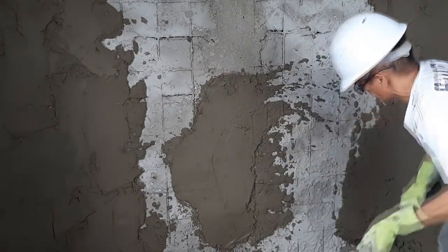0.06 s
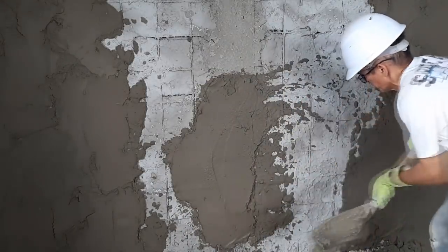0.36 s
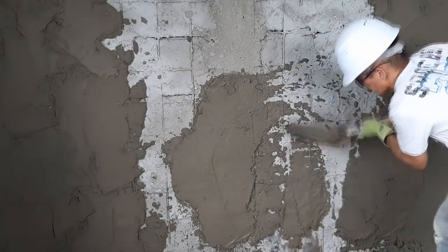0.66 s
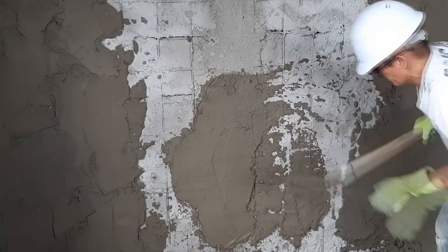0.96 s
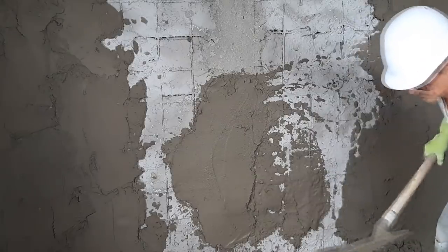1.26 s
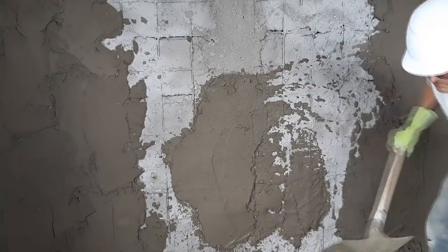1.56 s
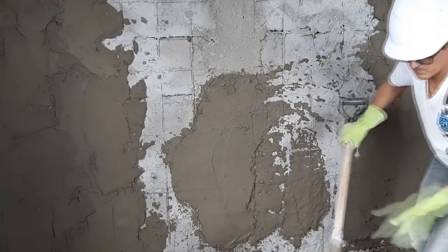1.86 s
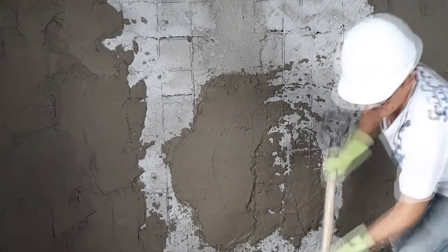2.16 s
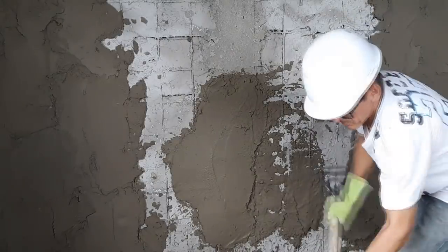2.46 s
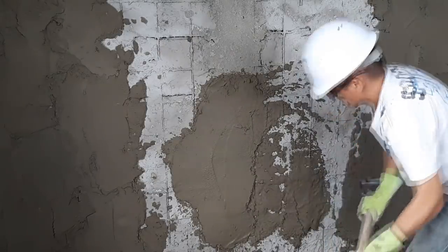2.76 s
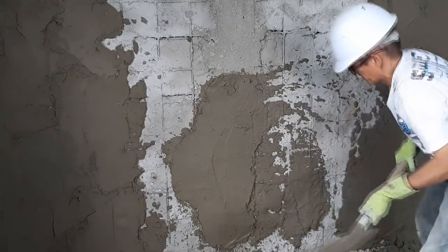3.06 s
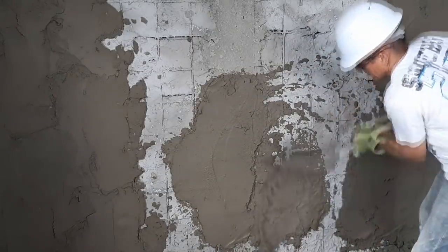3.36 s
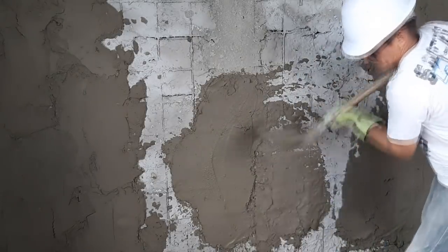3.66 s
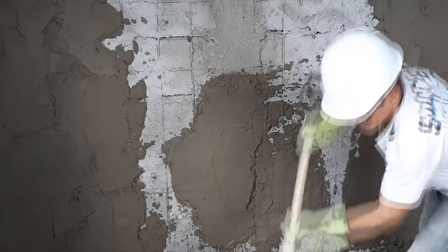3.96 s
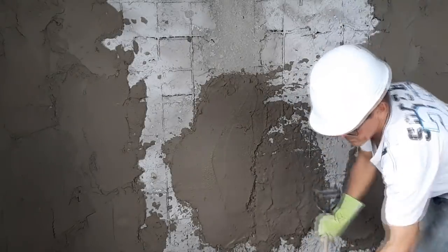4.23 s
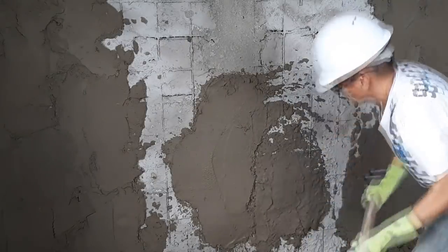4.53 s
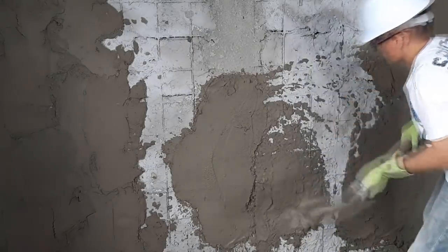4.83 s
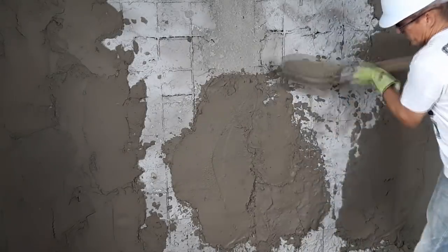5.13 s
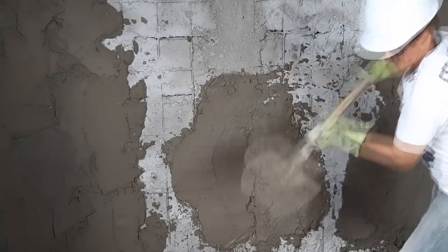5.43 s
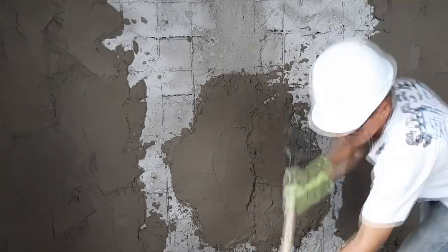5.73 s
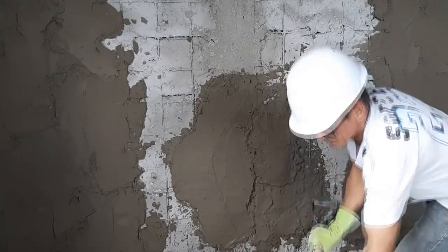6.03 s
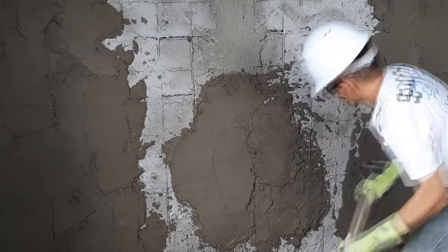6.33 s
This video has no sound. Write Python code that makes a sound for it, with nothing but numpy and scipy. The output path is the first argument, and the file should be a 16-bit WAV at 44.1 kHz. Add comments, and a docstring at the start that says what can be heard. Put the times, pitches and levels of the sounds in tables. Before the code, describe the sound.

A steel shovel scrapes up sandy mortar and throws it against a wall, landing in three wet, thudding splats with a short echo.

```python
"""Wet mortar slaps onto a block wall three times, shovelled off a concrete floor by a plasterer.
The steel blade grinds over sand; the load slides off it, lands as a burst of clods and spatters down.
The place is a bare room that rings briefly in the treble and booms in the bass, over a quiet site wash.
The stereo microphones stand far enough off to pick up more of the room than of the direct sound."""
import sys
import numpy as np
from scipy import signal
from scipy.fft import rfft, irfft
from scipy.io import wavfile
from scipy.ndimage import uniform_filter1d

SR = 44100
rng = np.random.default_rng(int(sys.argv[2]) if len(sys.argv) > 2 else 0)


def generate_wav(sig):
    """Save sig (samples, or channels by samples) to the path in sys.argv[1] as 16-bit PCM at SR."""
    pcm = np.round(np.clip(np.atleast_2d(sig).T, -1, 1) * 32767).astype(np.int16)
    wavfile.write(sys.argv[1], SR, pcm)


N = 281799
SPOTS = 3  # patches of the blade or load that sound at once
TAPS = 4096
HZ = np.fft.rfftfreq(TAPS, 1 / SR)
OCTAVES = np.log2(np.maximum(HZ, 400) / 3000)  # from 3 kHz; every tilt_db is in dB per octave

# the blade is driven into the heap: (time [s], length [s], level [dB], tilt [dB/octave],
# heap level [dB], blade note [Hz], note against heap [dB], judder level [dB])
HEAP_SCOOPS = [(2.289, .134, -15.5, 1.4, -27.5, 950, -8, -32.5),
               (4.121, 0.097, -14.5, 1.5, -18, 1142, -4.5, -42.5),
               (5.765, .125, -13, .95, -15.5, 1010, -12.5, -31.5)]
# the blade grazes the gritty floor: (time [s], length [s], level [dB], tilt [dB/octave])
FLOOR_GRAZES = [(0.21, 0.042, -40, -0.5), (0.25, 0.082, -30.5, 2), (0.294, 0.073, -28, 2.4),
                (1.467, 0.18, -39.5, 1), (1.593, 0.058, -39, 1), (1.736, 0.084, -40.5, 1),
                (1.799, 0.03, -32.5, -0.7), (2.078, 0.46, -35.5, -1), (2.181, .04, -22.5, -1.6),
                (2.522, 0.32, -46, 3.5), (3.69, 0.042, -46.5, -0.5), (4.075, 0.11, -25, -0.3),
                (4.304, 0.038, -35, 2.5), (5.427, 0.12, -41, 1), (5.558, 0.86, -50.5, 1),
                (6.045, 0.052, -35.5, -0.5)]
# wet mortar shifts on the blade: (time [s], length [s], level [dB], tilt [dB/octave])
MORTAR_SLIDES = [(0.105, 0.18, -48, 1), (0.402, 0.19, -24, 0.3), (0.949, 0.086, -32.5, .8),
                 (1.232, .15, -42, -1.5), (1.359, 0.15, -49.5, 2), (2.654, 0.044, -44, -1.5),
                 (2.845, 0.063, -47.5, 3.5), (3.014, 0.15, -47.5, 3.5), (3.085, .1, -29, -0.3),
                 (4.612, 0.081, -46, 2.5), (5.468, 0.099, -44, -7.5), (6.364, 0.038, -44.5, 0)]
# spectrum of crushed sand: (frequency [Hz], level [dB])
GRIT_SPECTRUM = [(35, -46), (60, -28.5), (153, -18.5), (189, -8.5), (308, -5), (458, -8), (579, -3),
                 (666, -3.5), (991, -2), (1950, -4.5), (2140, -3), (6140, -5.5), (7750, -12.5),
                 (13900, -10), (16000, -63)]
# likeness of the room sound at the two microphones: (frequency [Hz], coherence [0-1])
MIC_COHERENCE = [(100, 1), (290, 0.91), (640, 0.59), (1400, 0), (3000, 0)]


def amp(db):
    return 10 ** (np.asarray(db) / 20)


def unit_rms(x):
    return x / np.sqrt(np.mean(x ** 2) + 1e-20)


def curve(points, hz):
    """Points joined by straight lines on a log-frequency axis, flat above 14 kHz."""
    point_hz, value = np.transpose(points)
    return np.interp(np.log(np.minimum(hz, 14000) + 1), np.log(point_hz + 1), value)


def colour(spectrum, tilt_db):
    """Gain of a spectrum tilted brighter or duller."""
    return amp(curve(spectrum, HZ) + tilt_db * OCTAVES)


def add(mix, at_s, sound):
    part = mix[round(at_s * SR):][:len(sound)]
    part += sound[:len(part)]


def resonance(hz, width):
    """Gain of one resonance over frequency."""
    return 1 / np.sqrt(1 + ((HZ ** 2 - hz ** 2) / (width * HZ + 1e-9)) ** 2)


def ring(drive, envelope, gain, db):
    """An enveloped drive rings through a minimum-phase filter; db is the level at envelope 1."""
    cepstrum = irfft(np.log(np.maximum(gain / gain.max(), 1e-5)))
    cepstrum[1:TAPS // 2] *= 2
    cepstrum[TAPS // 2 + 1:] = 0
    response = irfft(np.exp(rfft(cepstrum)))
    sound = signal.fftconvolve(drive * envelope, response)
    return amp(db) * sound * np.linalg.norm(envelope) / (np.linalg.norm(sound) + 1e-12)


def grains(size, per_s, spread_db):
    """Clicks at random moments, most small and a few large; each spot gets its share of them."""
    strength = amp(spread_db * np.minimum(rng.exponential(1, size), 3.5))
    sign = rng.choice([-1, 1], size)
    hits = rng.random(size) < per_s / SPOTS / SR
    return strength * sign * (hits + 1e-3)


def clumps(size, per_s, depth_db):
    """Uneven pressure: a gain that wanders at random."""
    wander = np.interp(np.arange(size) / SR * per_s, np.arange(1000), rng.standard_normal(1000))
    return amp(depth_db * wander)


def stroke(swell_s, fade_s, bite):
    """Speed of a stroke: first contact (bite, 0-1), a push to the top, and slowing to rest."""
    t = np.arange(int((swell_s + fade_s) * SR)) / SR
    contact = np.minimum(t / (0.3 * swell_s), 1)
    push = bite + (1 - bite) * np.sin(np.pi / 2 * t / swell_s) ** 2
    slowing = np.cos(np.pi / 2 * (t - swell_s) / fade_s)
    return np.where(t < swell_s, push, slowing) * contact


def site_air():
    """The quiet wash of the site at both microphones, with a faint drone at 97 Hz."""
    # spectrum of the wash: (frequency [Hz], level [dB])
    wash_spectrum = [(15, -41.5), (25, -11), (170, 1.5), (714, -7), (1020, -11.5), (1160, -12.5),
                     (2160, -16), (2760, -17), (5570, -16.5), (6560, -14.5), (7710, -34), (13600, -24),
                     (16000, -55.5)]
    hz = np.fft.rfftfreq(N, 1 / SR)
    left, unrelated = rfft(rng.standard_normal((2, N)))
    coherence = curve(MIC_COHERENCE, hz)
    pair = np.array([left, coherence * left + np.sqrt(1 - coherence ** 2) * unrelated])
    wash = unit_rms(irfft(pair * amp(curve(wash_spectrum, hz)), N))
    drone = unit_rms(irfft(left / (1 + ((hz - 97) / 3) ** 2), N))
    return amp(-54) * wash + amp(-66.5) * drone


def reflections(t):
    """Dense echoes off bare walls, alike at both microphones in the bass, dying fastest in the treble."""
    # reverberation of the room: (frequency [Hz], T60 [s])
    decay_times = [(60, 1.43), (150, 0.36), (400, 0.81), (1000, 0.53), (3000, 0.44), (8000, 0.32),
                   (15000, 0.24)]
    echoes = rng.standard_normal((2, len(t))) * (t > 0.002) * (1 + 0.99 * np.exp(-t / 0.012))
    hz, frame_s, bands = signal.stft(echoes, SR, nperseg=512)
    coherence = curve(MIC_COHERENCE, hz)[:, None]
    bands[1] = coherence * bands[0] + np.sqrt(1 - coherence ** 2) * bands[1]
    bands *= 10 ** (-3 * frame_s / curve(decay_times, hz)[:, None])
    energy = (abs(bands) ** 2).sum(2, keepdims=True)
    bands /= np.sqrt(uniform_filter1d(energy, size=3, axis=1))
    tail = signal.istft(bands, SR, nperseg=512)[1][:, :len(t)]
    return tail / np.linalg.norm(tail, axis=1, keepdims=True)


def room(sound):
    """From one spot to the microphones: echoes, the direct path and standing waves."""
    # standing waves between the walls: (frequency [Hz], relative level [dB], T60 [s])
    standing_waves = [(60, -29, 0.9), (111.5, -7.5, 1.1), (139.6, -4, 0.52), (228, -7.5, 0.72)]
    null_hz = 81  # the gap between the two lowest
    t = np.arange(SR) / SR
    response = amp(-0.5) * reflections(t)
    arrivals = 6 + rng.integers(-6, 7, 2)  # direct path to each microphone, in samples
    response[[0, 1], arrivals] += amp(-6)
    for hz, db, t60 in standing_waves:
        rate = np.log(1000) / t60
        response += amp(db + 8) * 2 * rate / SR * np.exp(-rate * t) * np.cos(2 * np.pi * hz * t)
    response = signal.lfilter(*signal.iirnotch(null_hz, 2.6, SR), response)
    return signal.fftconvolve(sound[None], response, axes=1)[:, :N]


def loose_sand():
    """Grains roll and crumble in clumps after each stroke, louder and longer after a hard one."""
    t, level = np.arange(SR) / SR, np.zeros(N + SR)
    for at_s, _, db, *_ in HEAP_SCOOPS + FLOOR_GRAZES + MORTAR_SLIDES:
        span = slice(round(at_s * SR), round(at_s * SR) + SR)
        settle_s = 0.65 * amp(0.22 * db)
        settling = np.minimum(t / 0.02, 1) / (1 + (t / settle_s) ** 4)
        level[span] = np.maximum(level[span], amp(-47.5 + 0.26 * db) * settling)
    sand = grains(N, per_s=1500, spread_db=5) * clumps(N, per_s=40, depth_db=3)
    return level[:N] * ring(sand, np.ones(N), colour(GRIT_SPECTRUM, tilt_db=0.4), db=0)[:N]


def crack(db, tilt_db):
    """A pebble is crushed against the steel in a few milliseconds."""
    t = np.arange(SR // 30) / SR
    fragments = grains(len(t), per_s=8000, spread_db=3)
    return ring(fragments, np.exp(-t / 0.007), colour(GRIT_SPECTRUM, tilt_db), db)


def clink(db, hz, t60):
    """One bending mode of the blade, soon damped by the mortar on it."""
    t = np.arange(SR // 4) / SR
    envelope = amp(db - 60 * t / t60) * np.minimum(t / 0.006, 1)
    return envelope * np.sin(2 * np.pi * (hz * t + rng.random()))


def judder(swell_s, fade_s, db, hz, width):
    """A run of soft jolts shakes one damped, low resonance."""
    speed = stroke(swell_s, fade_s, bite=0.3)
    jolts = grains(len(speed), per_s=600, spread_db=1.5)
    body = resonance(hz, width) ** 2 + amp(-16.5) * resonance(hz, hz) ** 2
    return ring(jolts, speed, body, db)


def drag(length_s, db, hz, width):
    """The heavy shovel judders while it is pulled along."""
    return judder(0.47 * length_s, 0.53 * length_s, db, hz, width)


def bubbles(size, per_s, low_hz, high_hz, cycles, glide, pitches=7):
    """Air pockets in the paste pop with short rising notes."""
    out = np.zeros(size)
    for hz in np.geomspace(low_hz, high_hz, pitches) * rng.uniform(0.85, 1.15, pitches):
        age = np.arange(int(cycles * SR / hz)) * hz / (cycles * SR)  # 0-1 over one pop
        pop = np.sin(2 * np.pi * cycles * age * (1 + glide * age)) * np.exp(-4 * age) * np.sqrt(hz)
        count = 1 + int(per_s / SPOTS / pitches * size / SR)
        for at_s, db in zip(rng.random(count) * size / SR, 4 * rng.exponential(1, 99)):
            add(out, at_s, amp(min(db, 14)) * pop)
    return unit_rms(out)


def slide(length_s, db, tilt_db):
    """The load slides a little way: wet sand shears over the steel and squelches."""
    # spectrum of shearing paste: (frequency [Hz], level [dB])
    paste_spectrum = [(35, -42), (60, -28), (250, -4), (458, -3), (607, 0.5), (803, -5), (1220, 0.5),
                      (1340, -1), (2970, -3), (6280, -7), (7570, -16.5), (13000, -19), (16000, -33)]
    speed = stroke(0.38 * length_s, 0.62 * length_s, bite=0.47)
    sand = unit_rms(grains(len(speed), per_s=4500, spread_db=3.5))
    sand *= clumps(len(speed), per_s=160, depth_db=1.5)
    pops = bubbles(len(speed), per_s=450, low_hz=525, high_hz=4320, cycles=25, glide=0.06)
    return ring(sand + amp(-16) * pops, speed, colour(paste_spectrum, tilt_db), db)


def scrape(swell_s, fade_s, db, bite, tilt_db, note_hz=970, note_db=-26):
    """Sand grains crack under the blade and ring its bending note and its many higher modes."""
    # higher modes of the steel blade: (frequency [Hz], width [Hz], level [dB])
    blade_modes = [(1786, 45, -1.5), (2150, 110, -19), (2800, 40, -4), (3300, 51, -7), (3630, 40, -8),
                   (4470, 33, -23), (5000, 59, -2), (6500, 260, 1.5), (8670, 41, -8)]
    speed = stroke(swell_s, fade_s, bite)
    modes = sum(amp(level) * resonance(hz, width) ** 2 for hz, width, level in blade_modes)
    steel = colour(GRIT_SPECTRUM, tilt_db) * (1 + 0.55 * modes)
    sand = grains(len(speed), per_s=4200, spread_db=4.2) * clumps(len(speed), per_s=160, depth_db=1.9)
    note = resonance(note_hz, width=260) ** 2
    return ring(sand, speed, steel, db) + ring(sand, speed, note, db + note_db)


def graze(length_s, db, tilt_db):
    """While the shovel is being placed, it catches the floor at once and slows to rest."""
    return scrape(0.01, length_s, db, bite=0.78, tilt_db=tilt_db)


def scoop(length_s, db, tilt_db, heap_db, note_hz, note_db, judder_db):
    """The blade speeds over the floor, rings and judders at the heap, then drags on, muffled by its load."""
    out = np.zeros(SR)
    push = scrape(0.39 * length_s, 0.61 * length_s, db, bite=0.46, tilt_db=tilt_db, note_hz=note_hz)
    heap = scrape(0.011, 0.058, heap_db, bite=0.71, tilt_db=-1, note_hz=note_hz, note_db=note_db)
    jolt = judder(0.015, 0.06, judder_db, hz=253, width=220)
    lift = scrape(0.014, 0.072, db=-37, bite=0.35, tilt_db=-3, note_hz=note_hz, note_db=-24)
    for share, sound in ((0, push), (0.5, heap), (0.5, jolt), (1.1, lift)):
        add(out, share * length_s, sound)
    return out


def swing():
    """Sand in the load hisses over the steel as it leaves the blade."""
    return scrape(0.076, 0.09, db=-37.5, bite=0.23, tilt_db=2.2, note_db=-32)


def clods(envelope, db, hz):
    """Soft lumps land one after another, each a dull push of air."""
    push = resonance(hz, width=0.76 * hz) / (1 + (HZ / (3.7 * hz)) ** 2)
    return ring(grains(len(envelope), per_s=900, spread_db=1.5), envelope, push, db)


def slap(splash_db, splash_s, tilt_db, thump_db, thump_s, thump_hz, slop_db, slop_hz, droplets_db):
    """The load flattens on the wall: a wet crack, thumping clods, slop as it sags, then stray droplets."""
    # spectrum of the splash: (frequency [Hz], level [dB])
    splash_spectrum = [(180, -33.5), (300, -5), (433, -7), (749, -2.5), (961, -6.5), (1100, -8),
                       (1430, -5.5), (1690, -8.5), (2000, -7.5), (3290, -8), (4830, -10.5), (6300, -10.5),
                       (7320, -21), (13500, -20.5), (16000, -40)]
    wet = colour(splash_spectrum, tilt_db)
    t, out = np.arange(SR // 2) / SR, np.zeros(SR)
    spreading = np.minimum(t / 0.0029, 1) * np.exp(-(t / splash_s) ** 2)
    spreading *= 1 + 0.5 * np.exp(-t / 0.0068)  # the leading edge hits hardest
    spray = unit_rms(grains(len(t), per_s=5000, spread_db=3.5)) * clumps(len(t), per_s=300, depth_db=2.6)
    pops = bubbles(len(t), per_s=900, low_hz=473, high_hz=3230, cycles=9.5, glide=0.14)
    add(out, 0, ring(spray + amp(-15) * pops, spreading, wet, splash_db))
    add(out, 0, clods(stroke(0.0083, thump_s, bite=0.96), thump_db, thump_hz))
    sagging = np.minimum(t / 0.0046, 1) * np.exp(-t / 0.061)
    slop = grains(len(t), per_s=700, spread_db=5.5)
    add(out, 0, ring(slop, sagging, resonance(slop_hz, width=620) ** 3, slop_db))
    falling = np.minimum(t / 0.06, 1) * np.exp(-np.maximum(t - 0.06, 0) / 0.14)
    droplets = grains(len(t), per_s=990, spread_db=4.5)
    add(out, 0, ring(droplets, falling, wet, droplets_db))
    return out


def plastering():
    """The work at one spot of the blade or of the spreading load, heard across the room."""
    # mortar hits the wall: (time [s], splash level [dB], splash length [s], tilt [dB/octave],
    # thump level [dB], thump length [s], thump pitch [Hz], slop level [dB], slop pitch [Hz], droplets [dB])
    wall_slaps = [(0.603, -14, 0.047, 0.84, -12, 0.081, 185, -20, 590, -35),
                  (3.412, -15, 0.053, 0, -27, 0.18, 143, -37, 476, -40),
                  (5.104, -14.5, 0.044, 0.14, -19, 0.081, 135, -23, 620, -36.5)]
    # pebbles crack under the blade: (time [s], level [dB], tilt [dB/octave])
    pebble_cracks = [(.077, -45, -0.5), (.252, -21.5, 4), (1.594, -26.5, 2.5), (2.083, -45, -1),
                     (2.803, -42, 5), (2.993, -42, 2.5), (3.901, -47.5, 0.5), (4.025, -42, 2.5),
                     (4.614, -35, -3.5)]
    # the blade strikes the floor: (time [s], level [dB], pitch [Hz], T60 [s])
    blade_clinks = [(2.193, -14.5, 985, .075), (5.485, -39, 1770, .11), (5.853, -27, 1020, .1)]
    # the loaded shovel bumps over the floor: (time [s], length [s], level [dB], pitch [Hz], width [Hz])
    shovel_drags = [(0.259, 0.12, -33.5, 227, 288), (1.392, 0.38, -33.5, 251, 104),
                    (1.585, .055, -32, 149, 111), (1.892, .17, -50.5, 236, 50),
                    (4.608, 0.043, -40.5, 284, 260), (6.049, .04, -33, 170, 203)]
    # loose mortar drops to the foot of the wall:
    # (time [s], swell [s], fade [s], level [dB], pitch [Hz], width [Hz])
    mortar_drops = [(0.719, 0.045, 0.091, -36, 125, 65), (3.535, 0.019, 0.11, -35, 128, 92),
                    (5.26, 0.046, 0.067, -33.5, 138, 62), (5.22, 0.12, 0.072, -38, 62, 15)]
    work = loose_sand()
    for source, events in ((slap, wall_slaps), (scoop, HEAP_SCOOPS), (graze, FLOOR_GRAZES),
                           (crack, pebble_cracks), (clink, blade_clinks), (slide, MORTAR_SLIDES),
                           (drag, shovel_drags), (judder, mortar_drops)):
        for at_s, *settings in events:
            add(work, at_s, source(*settings))
    for at_s, *_ in wall_slaps:
        add(work, at_s - 0.122, swing())  # just before the load lands
    return room(work)


def scene():
    """Blade and load are wide, so several spots sound at once, each with its own echoes."""
    work = sum(plastering() for _ in range(SPOTS)) / np.sqrt(SPOTS)
    return (work + site_air()) * amp([[1], [-1]])  # the left microphone is 2 dB louder


def record(dry):
    """The recorder clips peaks at full scale and cuts the treble above 16.15 kHz."""
    lowpass = signal.firwin(511, 16150, window=("kaiser", 9), fs=SR)
    return signal.oaconvolve(np.clip(dry, -1, 1), lowpass[None], "same")


dry = scene()
out = record(dry)
generate_wav(out)
```